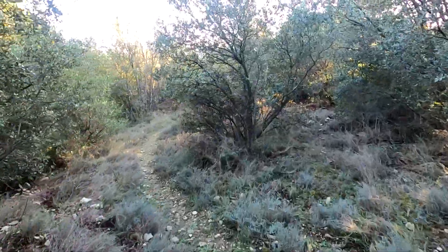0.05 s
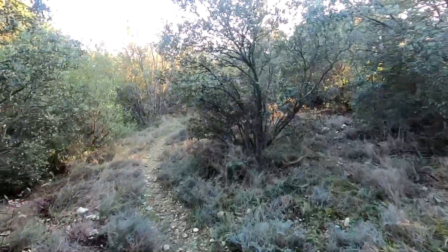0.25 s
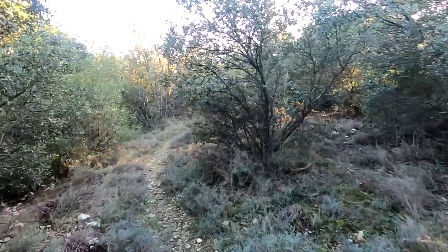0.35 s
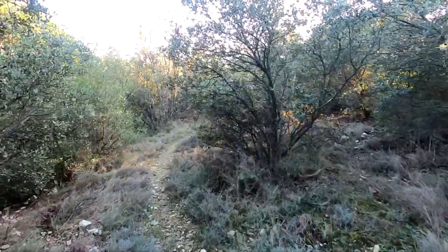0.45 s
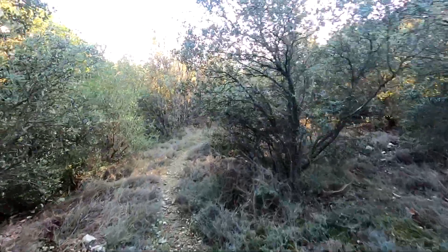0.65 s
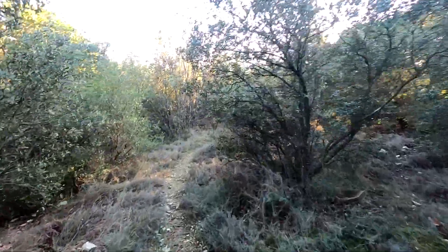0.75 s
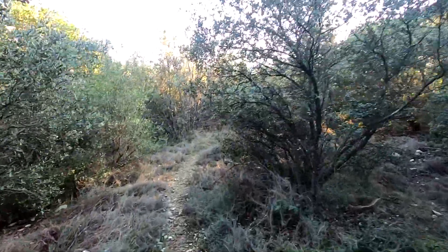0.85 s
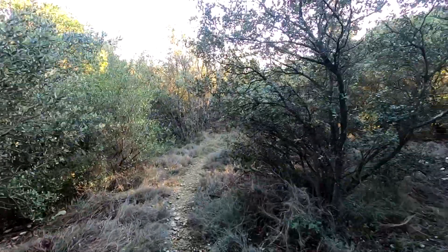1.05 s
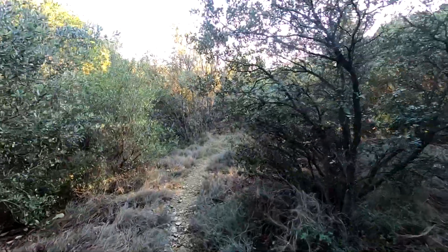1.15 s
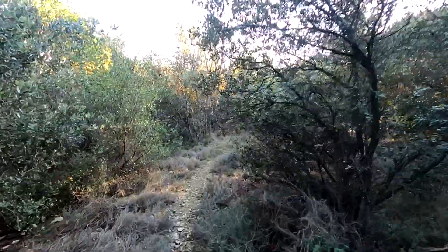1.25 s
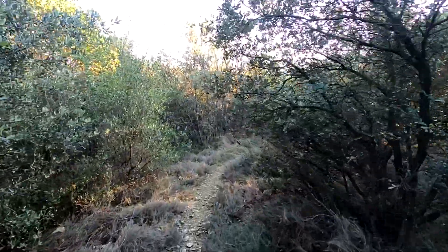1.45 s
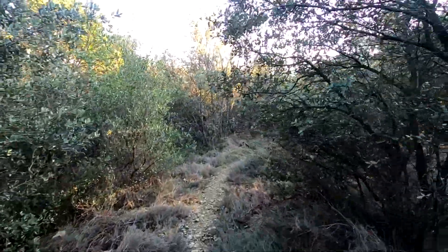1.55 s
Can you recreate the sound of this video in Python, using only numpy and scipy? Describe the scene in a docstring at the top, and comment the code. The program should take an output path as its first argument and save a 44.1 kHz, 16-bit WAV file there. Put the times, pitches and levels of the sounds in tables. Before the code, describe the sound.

Someone takes three steps along a grassy trail, knocking loose stones and crunching grit, the last step softer. Clothing rustles and dry stalks crackle close to the microphone in the walker's hand, with faint wind underneath.

```python
"""Three thudding footsteps on a stony, grassy path, heard at a microphone in the walker's hand.
Each impact knocks loose stones, fractures grit and jolts the microphone, forcing air into its ports.
Between the steps, friction makes clothes and dry grass rustle, and a few stalks snap.
A light wind rumbles underneath."""
import sys
import numpy as np
from scipy import signal
from scipy.fft import rfft, irfft, next_fast_len
from scipy.io import wavfile
from scipy.ndimage import map_coordinates

SR = 44100
rng = np.random.default_rng(int(sys.argv[2]) if len(sys.argv) > 2 else 0)


def waveform_to_disk(signal):
    """Save audio, clipped to [-1, 1], as 16-bit WAV at the path in sys.argv[1]."""
    frames = np.transpose(np.atleast_2d(signal))
    scaled = np.clip(frames, -1, 1) * 32767
    samples = np.round(scaled).astype(np.int16)
    wavfile.write(sys.argv[1], SR, samples)


N = 70560

# Envelopes of the continuous sources. Each row: time in seconds, relative level in dB.
WIND_ENVELOPE = [(0, -54.5), (.06, -58), (.13, -53.5), (.28, -67), (.34, -62), (.39, -63), (.5, -63),
                 (.57, -67.5), (.68, -69), (.76, -55.5), (.86, -47), (.93, -56.5), (1.0, -58.5),
                 (1.07, -59.5), (1.18, -60), (1.3, -54.5), (1.45, -64.5), (1.6, -64.5)]
CLOTH_ENVELOPE = [(0, -61.5), (.19, -58.5), (.34, -56), (.41, -59), (.5, -61), (.55, -69), (.62, -65),
                  (.69, -61), (.8, -59.5), (1.0, -61), (1.08, -68), (1.17, -62), (1.32, -58), (1.39, -61.5),
                  (1.49, -60), (1.6, -65)]
GRASS_ENVELOPE = [(0, -63), (.08, -68), (.2, -60.5), (.34, -62), (.39, -67.5), (.48, -62.5), (.55, -70.5),
                  (.63, -71), (.74, -60), (.86, -63.5), (.9, -67), (.97, -62.5), (1.11, -67), (1.26, -68),
                  (1.41, -65), (1.54, -64.5), (1.6, -67.5)]
# Spectra of the noise sources. Each row: frequency in Hz, relative level in dB.
WIND_SPECTRUM = [(10, -19.5), (28, 3), (60, -11), (110, -14), (300, -25), (1000, -75)]
HUSH_SPECTRUM = [(30, 8), (110, -6), (180, 10), (300, -4.5), (600, -18), (1500, -14), (8000, -67)]
CLOTH_SPECTRUM = [(100, -5.5), (300, 0), (500, 4.5), (780, -2), (1300, 4), (1750, -0.5), (2300, 0),
                  (3000, -3), (4000, -13.5), (7000, -26), (12000, -77)]
GRASS_SPECTRUM = [(1000, -21), (3000, 0), (4500, -0.5), (7400, -3.5), (8600, -10), (9600, -17.5),
                  (10800, -61), (12500, -50)]
GRIT_SPECTRUM = [(100, 6), (350, 2.5), (750, -4.5), (1350, -2.5), (1800, -1.5), (2600, -1), (4000, -4.5),
                 (7400, -5), (8800, -12), (11000, -22), (13000, -54)]
CLICK_SPECTRUM = [(150, -10), (700, -1), (1400, 0), (2500, -9), (6000, -19), (9000, -30), (12000, -55)]
SOIL_SPECTRUM = [(60, -39), (170, -1), (300, -13), (480, 10.5), (750, 7), (1300, -4.5), (2000, -8),
                 (8000, -18)]
# Rubs of sole and fabric, and at 0.839 s the lingering ring of a struck stone. Each row: centre in seconds,
# half-length in seconds, level in dB, pitch in Hz.
SCRAPES = [(0.137, 0.038, -57, 2210), (0.301, .016, -54, 1310), (0.306, 0.012, -54.5, 2680),
           (0.719, 0.0034, -53, 1350), (.775, 0.0081, -52, 2490), (0.839, 0.0061, -49, 1340),
           (1.199, 0.18, -65.5, 1275), (1.3, 0.041, -64, 2500), (1.324, .018, -62, 1390),
           (1.57, 0.015, -65.5, 1380)]
# Breaking stalks. Each row: start in seconds, nominal peak level in dB, pitch in Hz.
SNAPS = [(0.123, -47.5, 7800), (0.2385, -36, 7750), (0.2363, -36, 7950), (0.316, -36, 2700),
         (0.3334, -34, 3270), (0.7156, -33, 5800), (0.781, -34.5, 6630), (0.979, -42, 6100),
         (1.15, -36.5, 7500), (1.228, -40, 4770), (1.301, -45, 2600), (1.5465, -46, 4820)]
# Grit under the sole. Each row: peak time in seconds, level in dB, rise and fall time constants in
# seconds, treble tilt in dB per octave.
CRUNCHES = [(0.123, -51, 0.024, 0.02, -3.5), (0.233, -48, 0.024, 0.026, -3.5),
            (0.286, -48, 0.0074, 0.042, -4.5), (0.338, -49, 0.0048, 0.0061, -3.5),
            (.475, -59, 0.049, 0.074, -6), (.713, -55, 0.0027, 0.016, -1), (0.744, -60, 0.027, 0.026, 3),
            (0.777, -43, 0.013, 0.0093, -2), (0.799, -67, 0.019, 0.033, 4),
            (.837, -45.5, 0.0056, 0.0071, -1.5), (0.986, -57.5, 0.017, 0.028, -10),
            (1.152, -57, 0.0053, 0.0089, 3), (1.228, -61, 0.0016, 0.0051, 4),
            (1.258, -58, 0.058, 0.046, -0.5), (1.306, -68.5, 0.011, 0.033, 3.5),
            (1.47, -69, 0.039, 0.063, 5.5)]
# Contacts of sole and stones. Each row: start in seconds, level in dB, starting pitch in Hz,
# pitch drop in octaves per cycle, length in cycles, click level in dB relative to the knock.
KNOCKS = [(.084, -46.5, 1700, .5, 2.2, -7), (.2085, -28.5, 520, 1.6, 1.8, -11),
          (.2815, -45, 1400, .6, 2, -7), (.2932, -34, 1500, 1.3, 1.8, -14), (.295, -33, 280, 1.2, 1.5, -30),
          (.3042, -29, 1650, .7, 1.9, -16), (.305, -31, 210, 1.2, 1.4, -30),
          (.3295, -37.5, 1550, 1.1, 2, -12), (.368, -45, 1400, .8, 2.6, -14),
          (.4249, -46, 850, .7, 2.4, -13), (.7099, -34.5, 480, 1.4, 1.9, -22),
          (.7174, -35, 1650, .5, 2, -20), (.7187, -39, 360, .8, 1.8, -25), (.771, -40, 900, 1.2, 2.2, -9),
          (.792, -37, 1100, 1.4, 1.8, -10), (.8219, -36.5, 1450, .15, 2.5, -5),
          (.8243, -39.5, 380, .8, 2.3, -14), (.932, -53, 1400, .3, 4, 0), (1.059, -50, 1500, .2, 3, -8),
          (1.236, -39, 340, 1.5, 1.8, -25), (1.2435, -48, 450, 1, 2, -15), (1.2565, -48, 420, 1, 2.2, -15),
          (1.489, -48.5, 900, .7, 2.2, -12), (1.561, -45, 1750, 1.1, 3.2, -10),
          (1.5678, -44.5, 1100, 1.2, 2.4, -13), (1.5746, -43, 900, .6, 2.9, -12)]
# Pushes of air into the ports. Each row: centre in seconds, level in dB, half-width in seconds.
JOLTS = [(0.138, -42.5, 0.004), (0.234, -17, 0.011), (0.303, -34, 0.013), (0.335, -43, 0.0081),
         (0.737, -34, 0.013), (0.791, -18, 0.0093), (0.843, -30.5, 0.011), (1.2627, -21, 0.013),
         (1.294, -35.5, 0.027), (1.331, -31, 0.015)]
# Likeness of the two channels. Each row: frequency in Hz, correlation from 0 to 1.
COHERENCE = [(100, 0.65), (1200, 0.87), (2500, .86), (4500, 0.65), (9000, 0.35)]
# Imbalance of the ports. Each row: frequency in Hz, left minus right level in dB.
PORT_BALANCE = [(100, 0), (500, -2), (1200, 0), (2300, 2.5), (4200, 0.5), (6000, -4.5), (8000, -0.5),
                (12000, 1)]


def amp(db):
    """Amplitude ratio for a level in decibels."""
    return 10 ** (np.asarray(db) / 20)


def unit_rms(x):
    """Normalisation to an rms of 1."""
    return x / np.sqrt(np.mean(x ** 2) + 1e-20)


def along(points, hz):
    """Interpolation of (Hz, value) points on a logarithmic frequency axis."""
    freqs, values = np.transpose(points)
    return np.interp(np.log(hz + 1), np.log(freqs + 1), values)


def since(start):
    """Seconds elapsed since start, at every sample."""
    return np.arange(N) / SR - start


def level(rows):
    """Amplitude envelope through (seconds, dB) rows."""
    return amp(np.interp(since(0), *np.transpose(rows)))


def decay(t, t60):
    """Exponential damping: silence before t = 0, then a fall of 60 dB every t60 seconds."""
    return (t >= 0) * amp(-60 * np.abs(t) / t60)


def wobble(per_s):
    """Smooth random modulation: a spline through per_s Gaussian values a second."""
    return map_coordinates(rng.standard_normal(1024), [np.arange(N) * per_s / SR], mode="wrap")


def filtered(x, response):
    """Linear filtering: the spectrum of x times a frequency response."""
    size = next_fast_len(N + SR // 2)
    return irfft(rfft(x, size) * response(np.fft.rfftfreq(size, 1 / SR)), size)[..., :N]


def stereo(pair, colour_db):
    """Partial coherence: two uncorrelated signals are coloured and mixed to left and right, at rms 1."""
    angle = lambda hz: np.arccos(np.clip(along(COHERENCE, hz), -1, 1)) / 2
    mid, side = filtered(pair, lambda hz: amp(colour_db(hz)) * [np.cos(angle(hz)), np.sin(angle(hz))])
    return unit_rms(np.array([mid + side, mid - side]))


def noise(spectrum):
    """Gaussian stereo noise with the given spectrum."""
    return stereo(rng.standard_normal((2, N)), lambda hz: along(spectrum, hz))


def burst(envelope, colour_db):
    """Source and filter: noise follows the envelope, then is coloured, keeping the envelope's rms."""
    return np.sqrt(np.mean(envelope ** 2)) * stereo(envelope * rng.standard_normal((2, N)), colour_db)


def grains(per_s, spread_db):
    """Shot noise: tiny fractures at random times, a few much stronger than the rest."""
    sizes = amp(spread_db * np.minimum(rng.exponential(size=N), 5))
    return (rng.random(N) < per_s / SR) * sizes * rng.standard_normal((2, N))


def wind():
    """Pressure fluctuation: a draught rumbles at each port independently, over a low outdoor hush."""
    draught = unit_rms(filtered(rng.standard_normal((2, N)), lambda hz: amp(along(WIND_SPECTRUM, hz))))
    hush = amp(-69 + 0.98 * wobble(per_s=12)) * noise(HUSH_SPECTRUM)
    return amp(5) * level(WIND_ENVELOPE) * draught + hush


def rustle():
    """Friction noise: cloth rubs in the middle range while dry grass crackles above it."""
    cloth = noise(CLOTH_SPECTRUM) * amp(-0.5 + 1.45 * wobble(per_s=69.73))
    crackle = stereo(grains(per_s=7000, spread_db=2.5), lambda hz: along(GRASS_SPECTRUM, hz))
    grass = crackle * amp(-3.5 + 0.63 * wobble(per_s=89))
    return cloth * level(CLOTH_ENVELOPE) + grass * level(GRASS_ENVELOPE)


def scrapes(width_oct=0.23):
    """Resonance: each short, uneven rub of sole or fabric excites one narrow band; one row is instead the brief
    ring of a struck stone."""
    out = np.zeros((2, N))
    for centre, half_length, db, pitch in SCRAPES:
        stroke = np.exp(-(since(centre) / half_length) ** 2) * amp(db + wobble(per_s=140))
        band = lambda hz: -20 * np.log10(1 + (np.log2((hz + 1) / pitch) / width_oct) ** 2)
        out += burst(stroke, band)
    return out


def snaps(width_oct=0.28, crest_db=12):
    """Brittle fracture: each dry stalk breaks with a short, bright tick around its own pitch."""
    out = np.zeros((2, N))
    for start, db, pitch in SNAPS:
        band = lambda hz: -10 * np.log10(1 + (np.log2((hz + 1) / pitch) / width_oct) ** 6)
        out += burst(amp(db - crest_db) * decay(since(start), t60=0.012), band)
    return out


def crunches():
    """Granular fracture: grit breaks in dense grains that swell and fade as the weight rolls over it."""
    out = np.zeros((2, N))
    grit = grains(per_s=4000, spread_db=2)
    for peak_time, db, rise, fall, tilt_db in CRUNCHES:
        t = since(peak_time)
        weight = np.exp(np.minimum(t / rise, -t / fall))
        colour_db = lambda hz: along(GRIT_SPECTRUM, hz) + tilt_db * np.log2(1 + hz / 500)
        out += amp(db) * weight * stereo(grit, colour_db)
    return out


def knocks(rattle_db=-14):
    """Impact: a click and a brief vibration that slows as the stone beds in; the soil rattles after."""
    tone, clicks = np.zeros(N), np.zeros(N)
    for start, db, start_hz, drop_oct, length, click_db in KNOCKS:
        t = since(start)
        slowing = drop_oct * np.log(2)
        cycles = np.log1p(slowing * start_hz * np.maximum(t, 0)) / slowing
        swell = np.abs(np.sin(np.pi * np.minimum(cycles / length, 1))) ** 0.9
        tone += amp(db) * swell * np.sin(2 * np.pi * cycles)
        clicks += amp(db + click_db) * decay(t, t60=0.008)
    direct = tone + burst(clicks, lambda hz: along(CLICK_SPECTRUM, hz))
    soil_response = noise(SOIL_SPECTRUM) * decay(since(0), t60=0.06)
    rattle = signal.fftconvolve(direct, soil_response, axes=1)[:, :N]
    return direct + amp(rattle_db) * direct.std() * unit_rms(rattle)


def jolts(sway_hz=28.6, sway_db=-6.5, left_db=-6, left_lead_rad=1.4):
    """Damped oscillation: each jolt pushes air into the ports, then the microphone sways briefly."""
    pressure = np.zeros(N, complex)  # analytic signal, so a complex factor shifts its phase
    for centre, db, half_width in JOLTS:
        t = since(centre)
        push = -1 / (1 - 1j * t / half_width) ** 3
        sway = signal.hilbert(decay(t, t60=0.22) * np.sin(2 * np.pi * sway_hz * t))
        pressure += amp(db) * (push + amp(sway_db) * sway)
    left = amp(left_db) * np.exp(1j * left_lead_rad) * pressure
    return np.real([left, pressure])


def scene():
    """Superposition: the sounds of the steps add to the rustle and the wind."""
    return jolts() + knocks() + crunches() + snaps() + scrapes() + rustle() + wind()


def record(dry, left_lag_s=15e-6, top_hz=12600):
    """Level and time differences: the two ports differ slightly in colour and delay, then are low-passed."""
    sides = np.array([[0.5], [-0.5]])
    balance = lambda hz: amp(sides * along(PORT_BALANCE, hz))
    delay = lambda hz: np.exp(-2j * np.pi * hz * sides * left_lag_s)
    ports = filtered(dry, lambda hz: balance(hz) * delay(hz))
    return filtered(ports, lambda hz: hz < top_hz)


dry = scene()
out = record(dry)
waveform_to_disk(out)
```